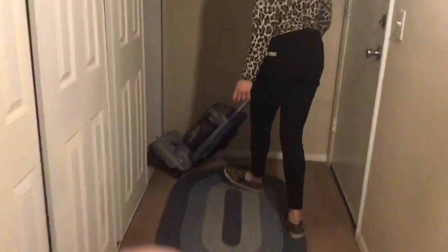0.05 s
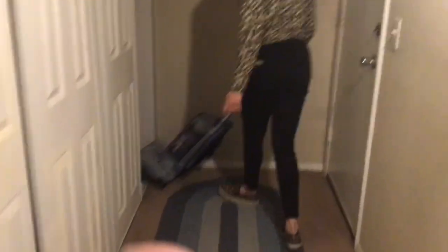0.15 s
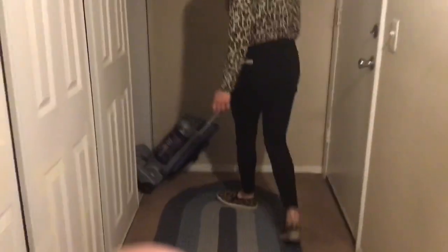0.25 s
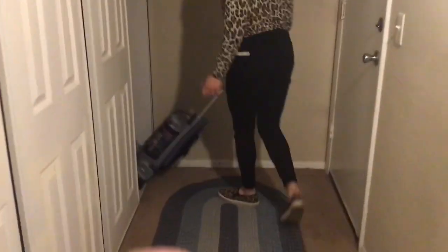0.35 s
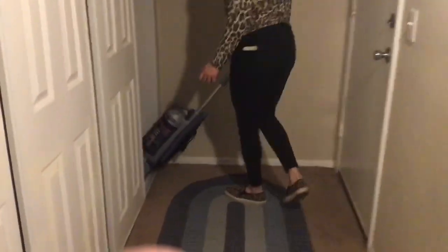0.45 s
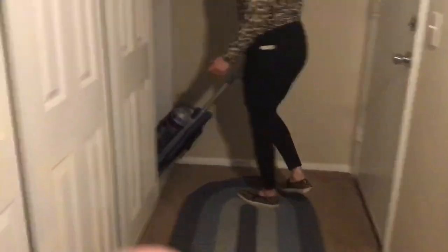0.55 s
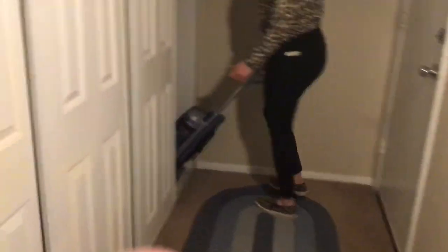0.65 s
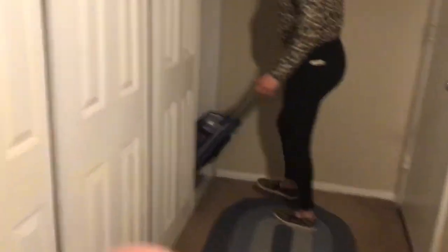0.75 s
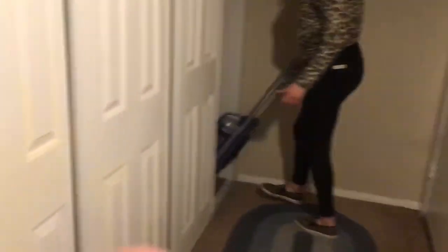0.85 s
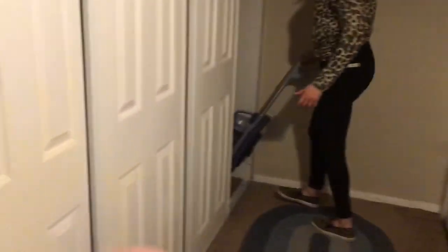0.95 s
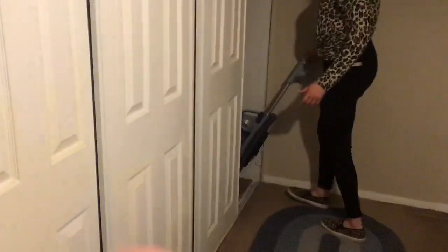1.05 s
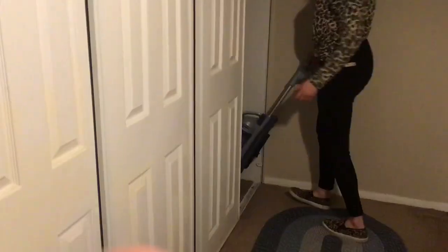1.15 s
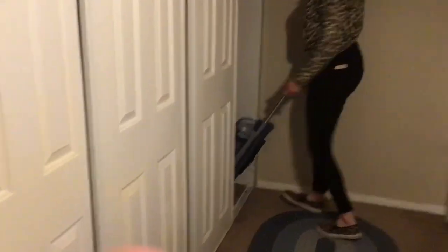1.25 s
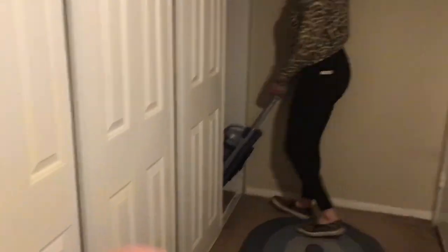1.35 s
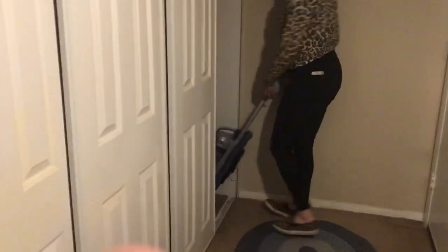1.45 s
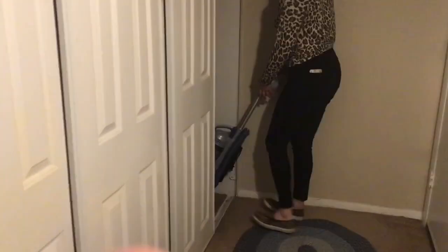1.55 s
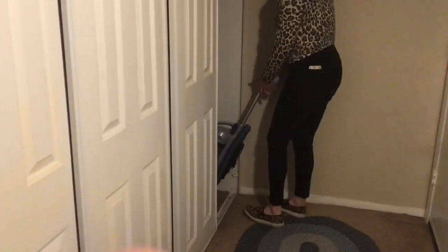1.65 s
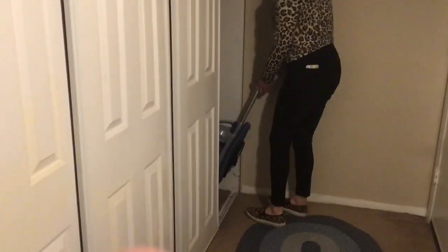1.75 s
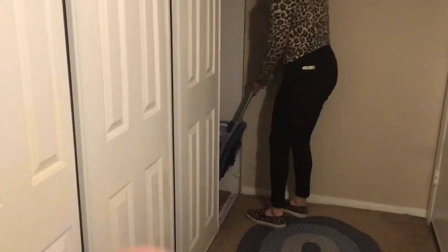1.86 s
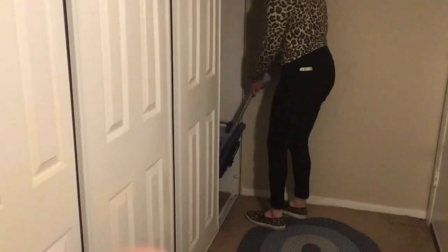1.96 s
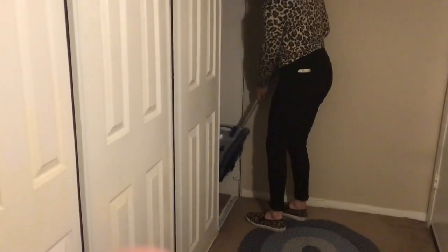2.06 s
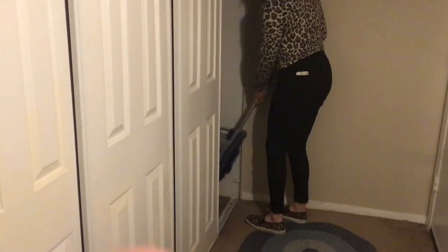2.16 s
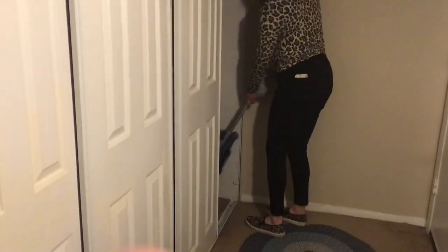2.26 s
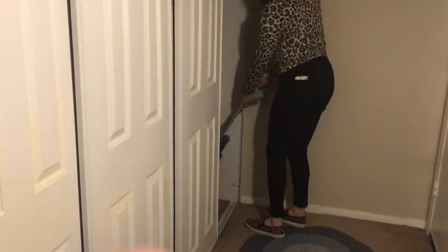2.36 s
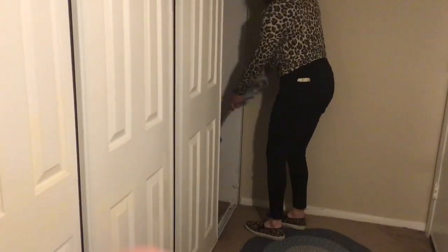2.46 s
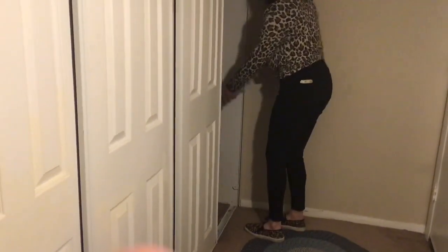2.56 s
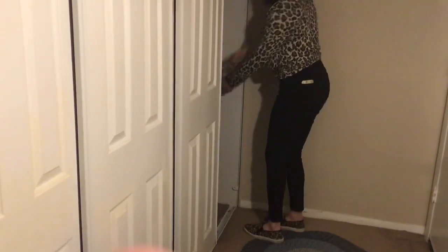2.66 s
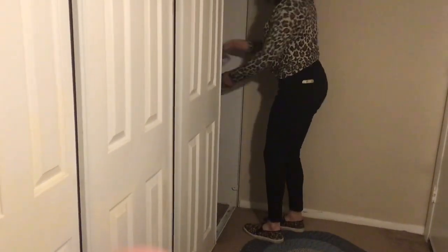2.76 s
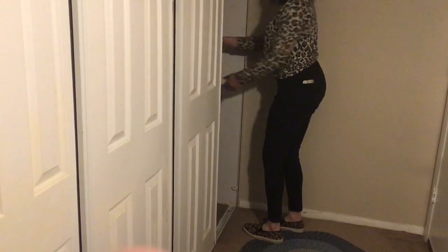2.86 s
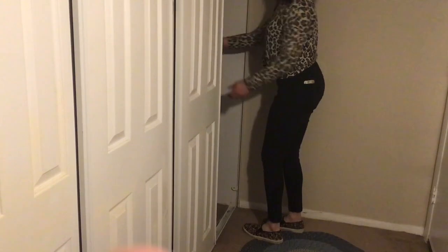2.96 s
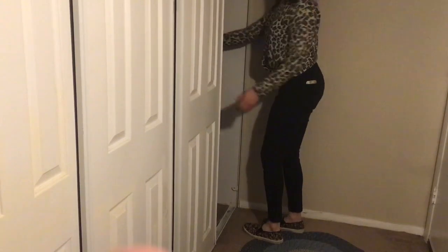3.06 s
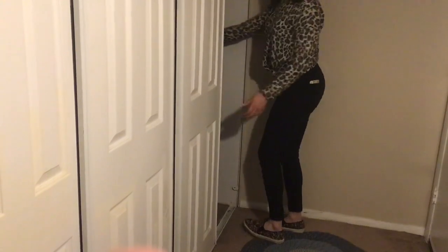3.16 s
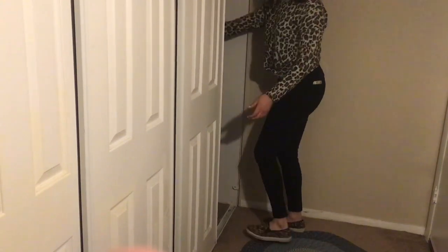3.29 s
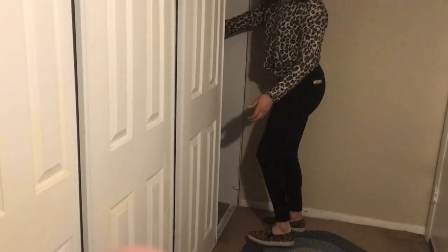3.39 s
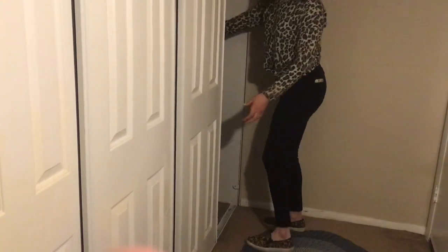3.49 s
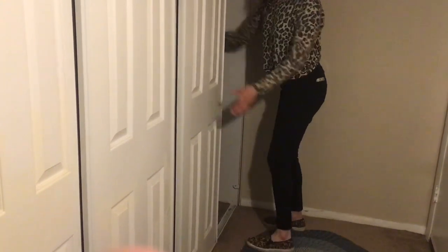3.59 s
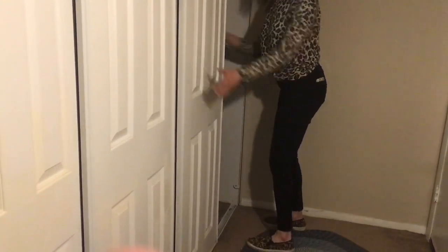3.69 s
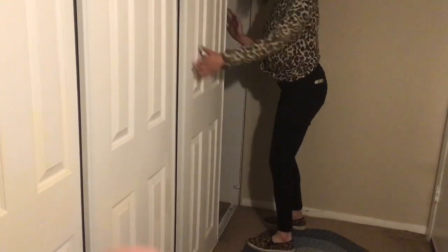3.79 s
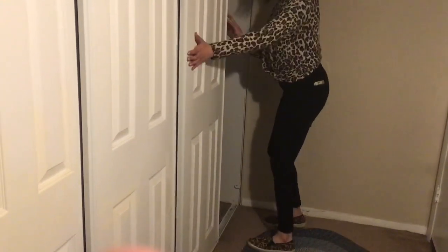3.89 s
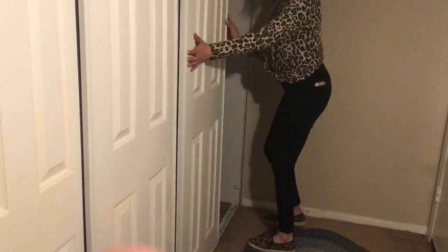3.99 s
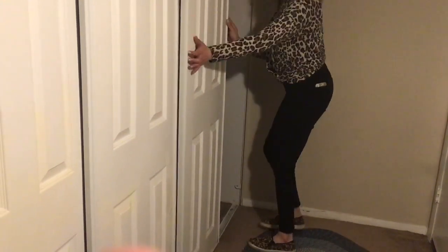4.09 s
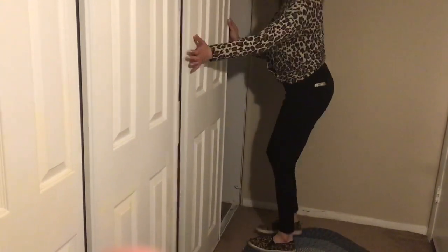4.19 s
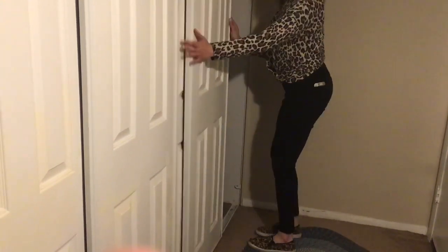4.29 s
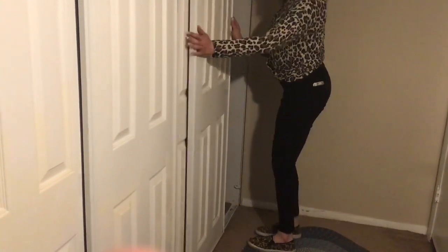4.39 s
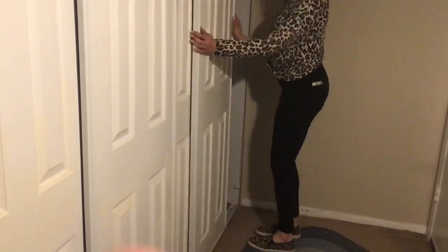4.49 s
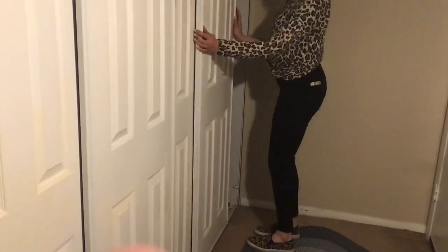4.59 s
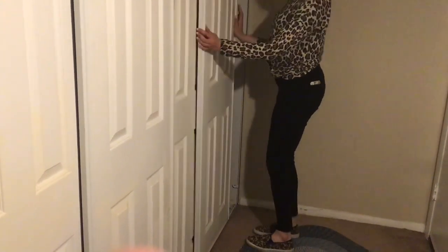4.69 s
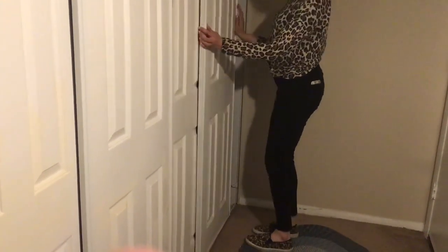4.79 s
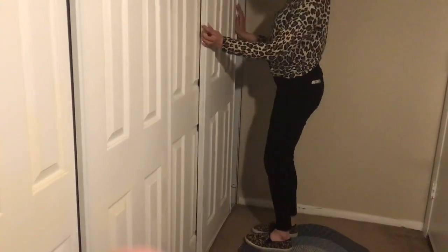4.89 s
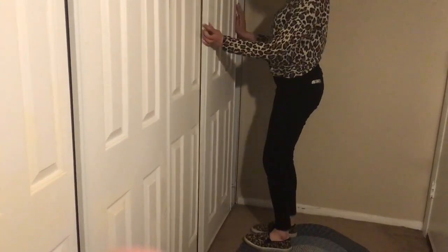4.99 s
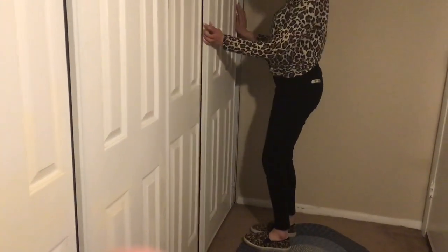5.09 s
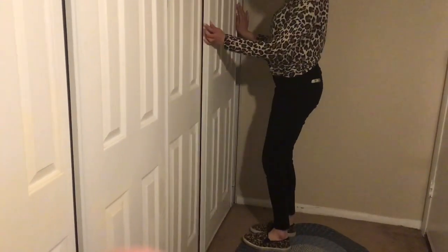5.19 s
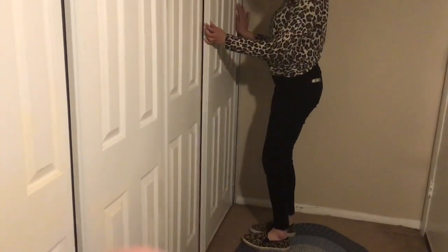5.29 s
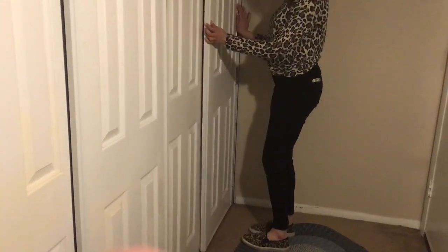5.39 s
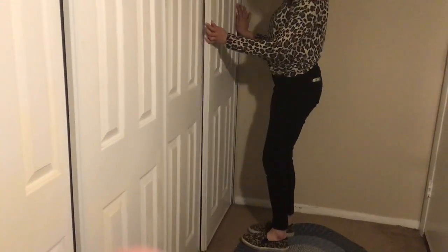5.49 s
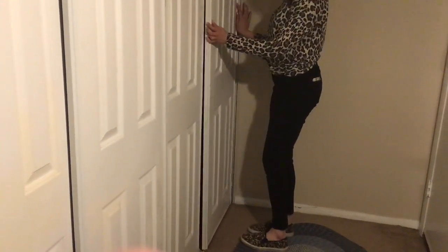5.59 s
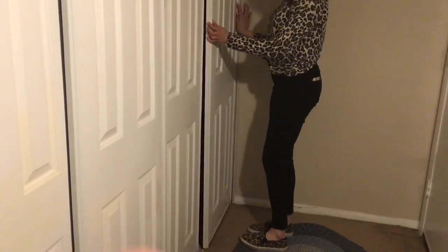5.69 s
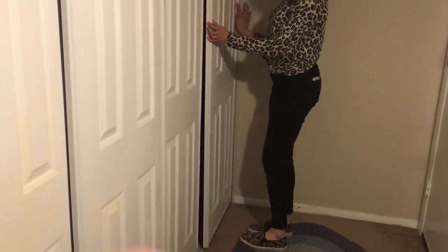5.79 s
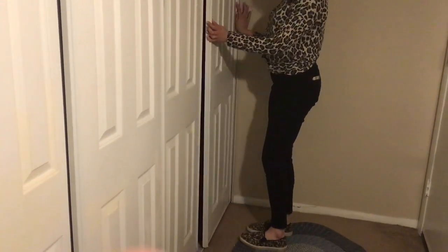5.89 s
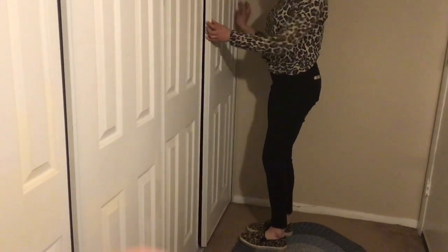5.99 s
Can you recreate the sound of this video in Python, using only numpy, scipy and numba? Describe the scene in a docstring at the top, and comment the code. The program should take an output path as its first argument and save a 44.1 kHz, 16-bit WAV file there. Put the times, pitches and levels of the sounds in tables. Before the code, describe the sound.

Low floor thumps and hard plastic knocks come first as a vacuum is pushed into a closet, followed by faint scuffing and a second heavier, boomy set-down. Small contacts tick through a lull. Then light hollow door panels judder along a track with gritty scraping and hiss, a brief thin squeak, a faint moan and a final double clack. Small indoor hallway, fairly close microphone, quiet room air.

```python
"""A narrow hallway: a vacuum cleaner is wheeled into a closet, bumps over the sill and is set down; feet shuffle.
Then hollow folding doors roll along their track, a guide squeaks, the track moans and the panels clack shut.
Bumps ring decaying floor and panel modes; knocks, wheels, soles and doors are gritty noise through
resonances and spectra; squeaks are sagging sines. Knocks and squeaks get a hall tail; quiet room air lies below."""
import sys
import numpy as np
from scipy import signal
from scipy.fft import rfft, irfft
from scipy.io import wavfile
from scipy.ndimage import uniform_filter1d
from numba import njit

SR = 44100
rng = np.random.default_rng(int(sys.argv[2]) if len(sys.argv) > 2 else 0)


def rack_gain(trim_db):
    """Turn a fader trim in dB into the linear factor to multiply a signal by."""
    fader = np.asarray(trim_db, float)
    return 10 ** (fader / 20)


def master_out(mix):
    """Clip the mix to full scale and print it as 16-bit PCM to the path in sys.argv[1]."""
    frames = np.transpose(np.atleast_2d(mix))
    ceiling = np.clip(frames, -1, 1)
    pcm = np.round(ceiling * 32767).astype(np.int16)
    wavfile.write(sys.argv[1], SR, pcm)


N = 266496
TIME = np.arange(N) / SR

# modes of floor, walls and panels: f/Hz, level/dB, t60/s
BOOM_MODES = [(55.2, 0.5, 0.36), (75.4, 2, 0.5), (99.4, 1.5, 0.29), (127.6, -3.5, 0.19), (166.8, 2, 0.27),
              (191, -7.5, 0.35), (239.2, 0.5, 0.39), (286, -5.5, 0.37), (354, -5, 0.82), (396, -26, 0.43),
              (430, -14, 0.29), (516, -33, 0.25), (600, -44, 0.17), (736, -68, 0.24)]
# spectrum of scuffs and hard contacts: f/Hz, level/dB (per Hz)
SCUFF_SPECTRUM = [(410, -35), (700, -2), (909, -9), (1170, -4), (1670, -6), (2190, -5.5), (2330, -6.5),
                  (2970, -8), (3820, -9), (4430, -20.5), (5600, -30.5), (7280, -35), (12300, -120)]
# treble spectrum of cloth, contacts and track hiss: f/Hz, level/dB (per Hz)
SWISH_SPECTRUM = [(2940, -8.5), (5000, -1.5), (6080, -4.5), (7120, -2), (7870, -3.5), (8530, 0),
                  (11500, -2.5), (15600, -18.5)]


def unit(x):
    """Scale to rms 1."""
    return x / np.sqrt(np.mean(x ** 2))


def colour(x, points):
    """Filter to a spectrum of (Hz, dB) points, joined along log frequency."""
    hz, db = np.transpose(points)
    f = np.maximum(np.fft.rfftfreq(len(x), 1 / SR), 1)
    gain = rack_gain(np.interp(np.log(f), np.log(hz), db))
    return irfft(rfft(x) * gain, len(x))


@njit
def svf(x, hz, width):
    """State-variable band-pass whose centre and width may move; gain 1 at the centre."""
    y, band_state, low_state = np.empty(len(x)), 0., 0.
    for i in range(len(x)):
        g = np.tan(np.pi * hz[i] / SR)
        damping = width[i] / hz[i]
        v = (band_state + g * (x[i] - low_state)) / (1 + g * (g + damping))
        band_state = 2 * v - band_state
        low_state += 2 * g * v
        y[i] = damping * v
    return y


def band(x, hz, width_hz):
    """Band-pass at fixed or moving centre."""
    return svf(x, hz + np.zeros(N), width_hz + np.zeros(N))


def narrow(x, hz, width_hz):
    """A resonance with steep flanks, rms 1."""
    return unit(band(band(x, hz, width_hz), hz, 3 * width_hz))


def walk(rate):
    """Random levels held 1 / rate s and slewed twice."""
    k = int(SR / rate)
    steps = np.repeat(rng.standard_normal(N // k + 1), k)
    return 1.92 * uniform_filter1d(uniform_filter1d(steps, k), k)[:N]


def grit(spread_db, patchy_db, rate):
    """Dense tiny contacts of uneven size, in patches."""
    level_db = spread_db * rng.exponential(size=N) + patchy_db * walk(rate)
    return unit(rng.standard_normal(N) * rack_gain(level_db))


def curves(table, fade_s=0.043):
    """Columns as sample curves, and a gate that is open within the table's span."""
    s, *columns = np.transpose(table)
    gate = np.interp(TIME, [s[0] - fade_s, s[0], s[-1], s[-1] + fade_s], [0, 1, 1, 0])
    return gate, [np.interp(TIME, s, c) for c in columns]


def swell(times, low_db=-14):
    """Enter at low_db, fade in, hold, fade back to low_db and stop."""
    level = rack_gain(np.interp(TIME, times, [low_db, 0, 0, low_db]))
    return level * (TIME > times[0]) * (TIME < times[-1])


def thumps():
    """A blow rings floor and panel modes, most those that move where it lands."""
    # heavy bumps: t/s, peak level/dB, floor ring f/Hz, panel level/dB, share of full decay
    bumps = [(0.182, -39.5, 96, 22, 0.77), (0.41, -29, 85, -16, 0.65), (0.466, -27, 51.6, -13, 0.6),
             (0.498, -21, 54.3, -12.5, 0.19), (0.534, -29.5, 102, -10, 1), (0.58, -31.5, 81, -14, 0.78),
             (0.791, -47.5, 58.6, -7, 0.86), (1.21, -48.5, 99, -11, 1), (1.378, -55, 81, -16, 0.36),
             (1.708, -48, 102, 3, 0.25), (1.75, -44, 112, -11, 0.51), (1.83, -50, 112, -10, 1),
             (2.009, -48, 116, -7, 0.32), (2.247, -44, 82.4, -18, 0.44), (2.304, -34.5, 77, -39, 1),
             (2.376, -34.5, 79.6, -16, 0.27), (2.4107, -29, 290, -17, 0.17), (2.454, -38.5, 86.1, 15, 0.92),
             (2.567, -23, 102, -20, 0.92), (2.63, -25, 72, -3.5, 0.66), (2.778, -48.5, 75.4, -34, 0.67),
             (3.153, -58, 91.5, 12, 0.67), (3.594, -50, 70.0, 12, 0.97), (3.773, -42, 109, -10.5, 0.55),
             (3.939, -48.5, 101, -7, 1), (4.041, -40.5, 92, 6, 0.64), (5.819, -31.5, 134, -19, 0.64),
             (5.826, -37.5, 385, -16, 0.32), (5.859, -37, 93.5, -22, 0.26), (5.927, -35, 113, 12, 0.52)]
    panel_hz = 207  # where a bump drives the door panels most
    out, t = np.zeros(N), np.arange(SR * 3 // 4) / SR
    hz, mode_db, t60 = np.array(BOOM_MODES).T[:, :, None]
    phases = rng.uniform(-.3, 0.67, (len(bumps), len(BOOM_MODES), 1))
    for (s, db, floor_hz, panel_db, share), phase in zip(bumps, phases):
        i = int(s * SR)
        n = min(len(t), N - i)
        floor_reach = rack_gain(-14 * np.abs(np.log2(hz / floor_hz)))
        panel_reach = rack_gain(panel_db - 17.7 * np.abs(np.log2(hz / panel_hz)))
        fade_db = -60 * t[:n] / (t60 * np.clip(share, .1, 2))
        build = 1 - np.exp(-t[:n] * hz / 0.23)  # low modes build up more slowly
        level = (floor_reach + panel_reach) * build * rack_gain(mode_db + fade_db)
        ring = (level * np.sin(2 * np.pi * hz * t[:n] + phase)).sum(axis=0)
        out[i:i + n] -= rack_gain(db) * ring / np.abs(ring).max()
    return out


def shell(drive, tilt_db):
    """Hollow body of panels and casing; larger parts lean to the low rings (tilt in dB per octave)."""
    # hollow plastic and wood shells: f/Hz, width/Hz, level/dB
    shell_rings = [(351.6, 91, 5.5), (395, 41, 2.5), (511.5, 51.6, 7), (613, 57, 6.5), (704, 128, 2),
                   (840, 12, -6), (964, 310, -1)]
    return unit(sum(rack_gain(db + tilt_db * np.log2(hz / 550)) * narrow(drive, hz, width)
                    for hz, width, db in shell_rings))


def clatter():
    """A first contact, a short rattle, then a quick fade; ring, treble and hollow body share the contacts."""
    # plastic and hardware knocks: t/s, relative level/dB, main ring f/Hz, treble level/dB, rattle length/s
    knocks = [(0.11, -55, 1258, -9, 0.014), (0.178, -44.5, 1050, -32, 0.018),
              (0.403, -33, 1230, -20, 0.011), (0.428, -38.5, 1260, -13, 0.014),
              (0.458, -23, 1910, -16, 0.023), (0.527, -29.5, 1290, -5.5, 0.014),
              (0.554, -36.5, 1370, -26, 0.026), (0.627, -51, 1480, -14, 0.01),
              (0.6977, -42, 3140, -13, 0.0083), (0.7855, -41.5, 806, -38, 0.0066),
              (0.858, -60, 2380, -1.5, 0.062), (1.09, -62, 2210, -9, 0.05),
              (1.2224, -47.5, 2090, -6, 0.012), (1.256, -54.5, 2600, -8, 0.015),
              (1.406, -58.5, 2120, -7, 0.05), (1.6741, -57.5, 1900, -12, 0.047),
              (1.702, -57, 3280, -2.5, 0.055), (1.897, -64.5, 2000, -4.5, 0.03),
              (2.008, -60, 1500, -18, 0.012), (2.146, -75.5, 3500, 18, 0.0051),
              (2.202, -62, 2780, -23, 0.032), (2.27, -57.5, 1580, -7, 0.081),
              (2.3249, -27.5, 1420, -27, 0.017), (2.384, -61, 3130, 3, 0.012),
              (2.404, -40, 1350, -28, 0.04), (2.4695, -42, 3170, -2.5, 0.0067),
              (2.547, -41.5, 2510, -11, 0.0085), (2.6034, -40.5, 1640, -8.5, 0.033),
              (2.6576, -50, 3070, 10, 0.012), (2.732, -63.5, 620, -17, 0.0063),
              (2.781, -54, 860, -25, 0.0089), (2.978, -59.5, 2310, -9, 0.009),
              (3.16, -55.5, 3400, -9, 0.0072), (3.264, -65, 1930, -0.5, 0.035),
              (3.433, -66, 1730, -6, 0.017), (3.77, -56, 890, -28, 0.0041), (3.941, -65, 3850, 3, 0.029),
              (4.027, -37, 2440, -7.5, 0.0095), (4.038, -43.5, 610, -26, 0.0068),
              (4.111, -51.5, 3020, -6.5, 0.037), (4.252, -52, 1280, -9.5, 0.052),
              (4.338, -44.5, 2100, 2, 0.0067), (4.426, -47, 2080, -4, 0.0087),
              (4.611, -42.5, 3300, -16, 0.015), (4.868, -52, 2200, 2.5, 0.022),
              (4.969, -45, 3700, 4.5, 0.0054), (4.995, -52.5, 2500, -0.5, 0.012),
              (5.183, -46.5, 2680, -14, 0.018), (5.23, -51.5, 1560, -5, 0.013),
              (5.378, -49, 1320, -24, 0.017), (5.579, -52, 2100, -9, 0.016),
              (5.738, -58.5, 3230, 7.5, 0.012), (5.819, -32.5, 2710, -9, 0.01),
              (5.857, -46.5, 2520, -7, 0.013), (5.892, -54.5, 2240, 6, 0.008),
              (5.9095, -42, 3000, -11.5, 0.0096)]
    rise_share, crack_s = 0.033, 0.002  # long rattles swell in; short ones open with a crack
    mid, top, body, ring_hz = np.zeros(N), np.zeros(N), np.zeros(N), np.full(N, 2000.)
    t = np.arange(SR // 3) / SR
    for s, db, hz, top_db, rattle_s in knocks:
        i = int(s * SR)
        n = min(len(t), N - i)
        rattle_s = max(rattle_s, .002)
        after = np.maximum(t[:n] - rattle_s, 0)
        body_db = -5.5 - 6.5 * np.log2(hz / 2000)  # small bright parts carry less hollow body
        layers = ((mid, 0, .3, .14), (top, top_db, 1.2, .12), (body, body_db, .1, .16))
        for add, layer_db, sharp, t60 in layers:
            rise = 1 - np.exp(-sharp * t[:n] / (rise_share * rattle_s))
            crack = 1 + sharp * crack_s / rattle_s * np.exp(-t[:n] / 0.0036)
            add[i:i + n] += rack_gain(db + layer_db - 11.0 - 60 * after / t60) * rise * crack
        ring_hz[i:] = hz
    contacts = grit(1.22, 1.09, 200)
    ring = unit(colour(contacts, SCUFF_SPECTRUM))
    ring += 0.61 * narrow(contacts, ring_hz, 0.25 * ring_hz)
    ring += 0.24 * narrow(contacts, 0.647 * ring_hz, 230)
    ring += 0.23 * narrow(contacts, np.minimum(1.445 * ring_hz, 4200), 480)
    treble = unit(colour(contacts, SWISH_SPECTRUM))
    return mid * unit(ring) + top * treble + body * shell(contacts, 1.9)


def rumble(drive, damp, tilt_db):
    """Continuous small jolts ring the same modes as the bumps, damped by hands and load."""
    rings = sum(rack_gain(db + tilt_db * np.log2(hz / 200)) * unit(band(drive, hz, damp * 1.7 / t60))
                for hz, db, t60 in BOOM_MODES)
    return narrow(rings, 278, 950)


def shuffle():
    """Wheels and soles on floor and rug drive low modes and a scuffing noise; cloth swishes with the scuffs."""
    # wheels, shoes and cloth: t/s, rumble level/dB, scuff level/dB
    moves = [(0.0, -52, -67.5), (0.16, -58.5, -66), (0.49, -53, -64.5), (0.62, -46.5, -70),
             (0.75, -61, -69.5), (0.95, -64, -76.5), (1.35, -69.5, -75.5), (1.55, -73.5, -82),
             (1.8, -67, -80), (2.29, -70.5, -75), (2.36, -51, -59.5), (2.43, -45, -65), (2.53, -56.5, -65),
             (2.59, -35.5, -57), (2.67, -62.5, -72), (2.75, -55.5, -72), (2.87, -69, -75.5),
             (3.0, -72, -82.5), (3.53, -72, -84), (4.01, -69, -76.5), (4.1, -47, -71)]
    gate, (low_db, mid_db) = curves(moves)
    top_db = -75 + 0.69 * (mid_db + 69.5)  # cloth is -75 dB at a scuff of -69.5 dB
    rub = grit(0.67, 0.97, 40)
    low = rumble(grit(3.13, 1.06, 30.35), 3.8, -0.82)
    scuff = unit(colour(rub, SCUFF_SPECTRUM))
    cloth = unit(colour(rub, SWISH_SPECTRUM))
    return gate * (rack_gain(low_db) * low + rack_gain(mid_db) * scuff + rack_gain(top_db) * cloth)


def doors():
    """Guides judder along the track: hollow panels boom, the track scrapes and rings, a thin hiss wanders."""
    # doors on the track: t/s, rumble level/dB, scrape level/dB
    roll = [(4.0, -69, -72), (4.15, -52, -72), (4.25, -54.5, -69), (4.37, -45.5, -57.5), (4.5, -44, -57),
            (4.69, -42.5, -53), (4.83, -43.5, -56.5), (4.95, -45.5, -61), (5.07, -46.5, -64),
            (5.19, -52.5, -60.5), (5.34, -50.5, -61), (5.43, -53, -68.5), (5.52, -60, -68),
            (5.74, -57.5, -70), (5.79, -54.5, -62.5), (5.91, -46.5, -80), (6.04, -56, -73.5)]
    # door panels while rolling: f/Hz, width/Hz, level/dB
    panel_rings = [(70, 43, -9), (91.4, 24, -3), (131, 21, -7), (166, 11, -5.5), (194.5, 15, 0),
                   (250.4, 28.4, -3), (322.3, 35, -7.5)]
    # track rings under the scrape: f/Hz, width/Hz, level/dB
    track_rings = [(1030, 90, -24), (1203, 60, 16), (1480, 98, 8), (1817, 40, 12.5), (2130, 51, 9),
                   (2030, 170, 3.5), (3370, 250, -12), (3830, 820, 10)]
    # spectrum of the scrape: f/Hz, level/dB (per Hz)
    scrape_spectrum = [(410, -17), (700, 0.5), (848, -15), (957, 3), (1220, -14), (1360, -0.5),
                       (2080, -5.5), (2410, -4), (3210, -4), (5600, -37), (7280, -71), (12300, -120)]
    # breathy strand, times/s: in, full, fading, out
    strand_s = (4.45, 4.75, 5.2, 5.33)

    gate, (low_db, mid_db) = curves(roll)
    body_db = -61.5 + 2.16 * (low_db + 50)  # hollow body follows the rumble
    top_db = -70 + 0.6 * (mid_db + 58.5)  # hiss follows the scrape
    rub, jolts = grit(2.1, 0.55, 70), grit(2.54, 0.9, 60)
    panels = unit(sum(rack_gain(db) * narrow(jolts, hz, width) for hz, width, db in panel_rings))
    # the contact point moves, so each ring swells, fades and drifts
    rings = sum(rack_gain(db + 2.5 * walk(16)) * narrow(rub, hz * (1 + .02 * walk(12)), width)
                for hz, width, db in track_rings)
    scrape = unit(unit(colour(rub, scrape_spectrum)) + .45 * unit(rings))
    hiss_ring = rack_gain(4 * walk(8)) * narrow(rub, 8500 * (1 + .015 * walk(5)), 400)
    hiss = unit(unit(colour(rub, SWISH_SPECTRUM)) + .1 * hiss_ring)
    strand_hz = 10600 + 400 * (TIME - strand_s[1])  # climbs 400 Hz per second
    strand_ring = narrow(rub, strand_hz * (1 + .025 * walk(10)), 800)
    strand = swell(strand_s) * rack_gain(-74.5 + 4 * walk(20)) * strand_ring
    boom = rack_gain(low_db) * panels + rack_gain(body_db) * shell(jolts, -6)
    return strand + gate * (boom + rack_gain(mid_db) * scrape + rack_gain(top_db) * hiss)


def squeaks():
    """The guide grabs, sings near one small ring with a rough edge, sags in pitch and dies."""
    # guide squeaks: t/s, level/dB, starting f/Hz, t60/s
    grabs = [(5.3509, -46.5, 9990, 0.15), (5.4223, -46, 9870, 0.12), (5.433, -34.5, 9660, 0.085),
             (5.4717, -48, 9400, 0.22), (5.6338, -58, 9980, 0.18), (5.654, -50, 9800, 0.14)]
    out, t = np.zeros(N), np.arange(SR // 5) / SR
    waver, flutter = walk(500), rack_gain(2.5 * walk(270))
    for s, db, hz, t60 in grabs:
        i = int(s * SR)
        pitch = hz * (1 - .1 * t + .005 * waver[i:i + len(t)])
        shape = rack_gain(db - 60 * t / t60) * (1 - np.exp(-t / 0.00075))
        out[i:i + len(t)] += shape * np.sin(2 * np.pi * np.cumsum(pitch) / SR)
    return out * flutter


def moan():
    """Slow rubbing excites one track ring, with a rough companion above."""
    # low moan of the track, times/s: in, full, fading, out
    moan_s = (5.3, 5.5, 5.74, 5.82)
    rub = grit(1.5, 1.5, 40)
    drift = 1 + .008 * walk(8)
    rings = narrow(rub, 1975 * drift, 110) + narrow(rub, 3600 / drift, 380)
    return swell(moan_s) * rack_gain(-67.5) * rings


def hall(x, t60_s, wet_db):
    """Diffuse tail of the hallway: decaying noise, duller than the direct sound."""
    t = np.arange(SR // 2) / SR
    tail = rng.standard_normal(len(t)) * rack_gain(-60 * t / t60_s) * (t > .004)
    tail = signal.lfilter([.5], [1, -.5], tail)
    return x + rack_gain(wet_db) * signal.fftconvolve(x, tail / np.linalg.norm(tail))[:N]


def room_air():
    """Steady air of the quiet room: coloured noise whose level wanders slightly."""
    # spectrum of the room air: f/Hz, level/dB (per Hz)
    air_spectrum = [(15, -42), (25, -13), (75, 14), (228, 6.5), (315, -2.5), (569, -1), (1030, -34),
                    (1500, -41), (2370, -30.5), (2640, -36), (4070, -15), (5930, -48), (11300, -23),
                    (15600, -27.5)]
    return rack_gain(-68 + 0.81 * walk(3.5)) * unit(colour(rng.standard_normal(N), air_spectrum))


def scene():
    """Knocks and squeaks with their hall tail, the other sources dry, over the room's air."""
    ringing = hall(clatter() + squeaks(), 0.26, -15.5)
    near = ringing + thumps() + shuffle() + doors() + moan()
    return (near + room_air())[None]


def top_cut(x):
    """Nothing passes above the cut-off."""
    return signal.sosfilt(signal.butter(12, 15800, fs=SR, output="sos"), x)


def record(dry):
    """The microphone drops the deepest bass, below 45 Hz."""
    bass_cut = signal.butter(8, 45, "high", fs=SR, output="sos")
    mix = signal.sosfilt(bass_cut, dry)
    return top_cut(mix)


dry = scene()
out = record(dry)
master_out(out)
```